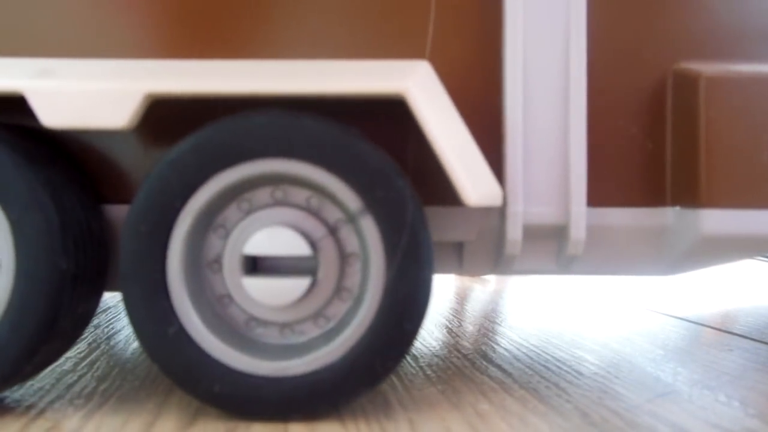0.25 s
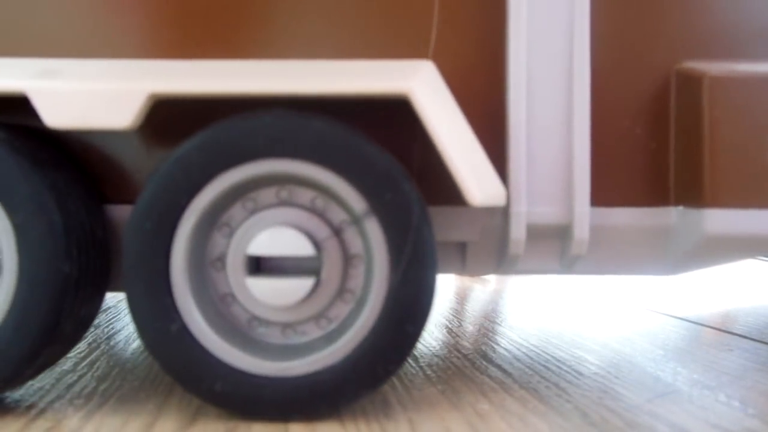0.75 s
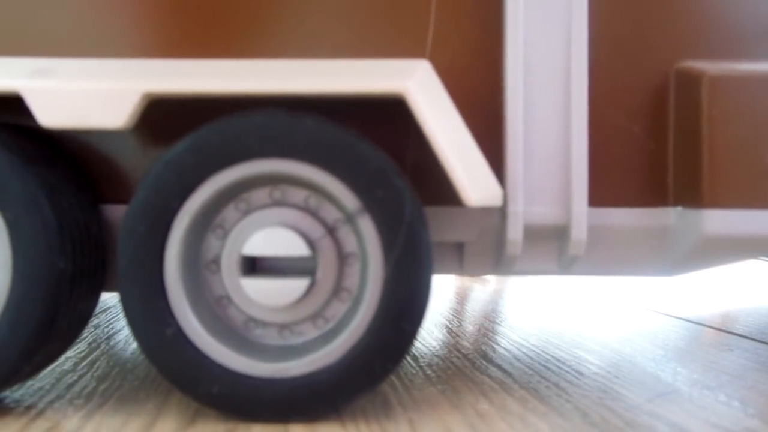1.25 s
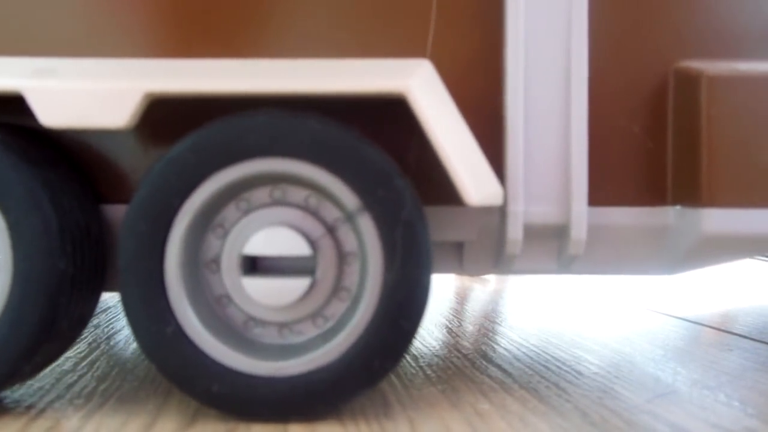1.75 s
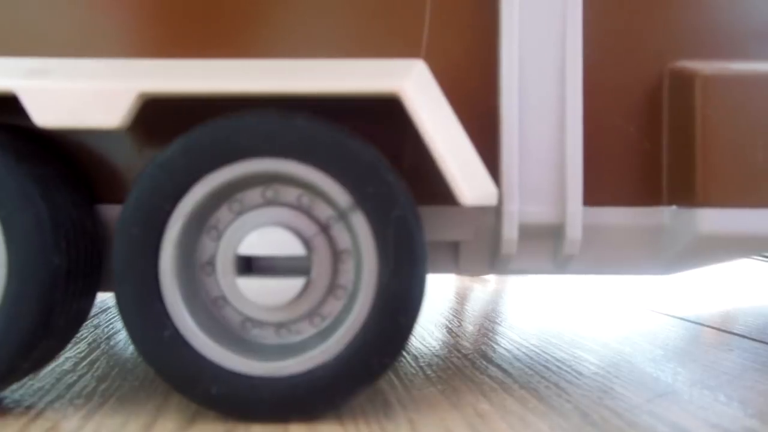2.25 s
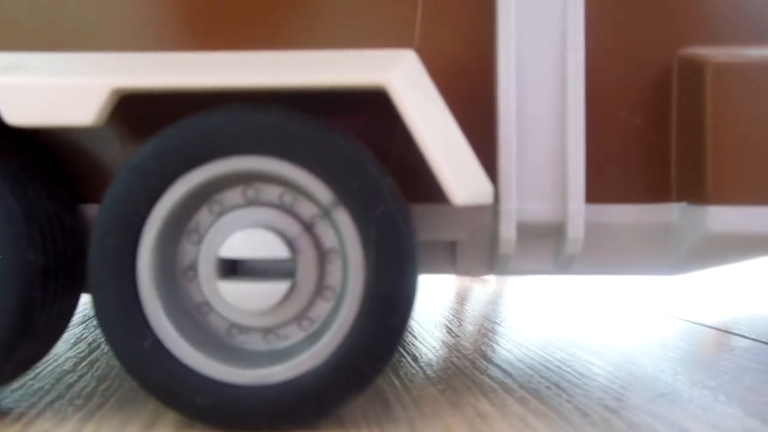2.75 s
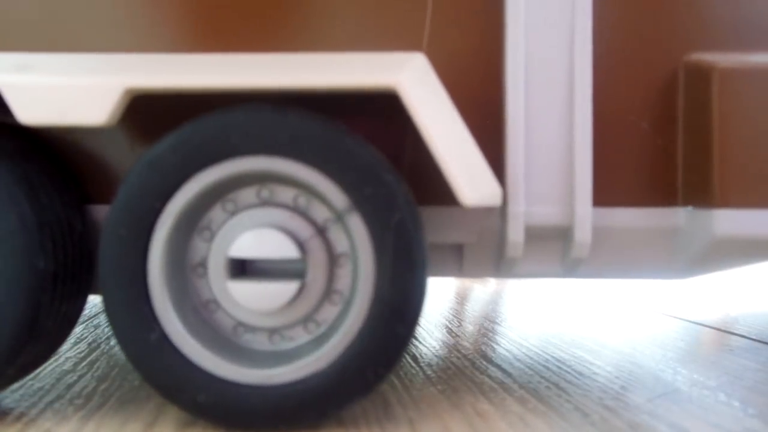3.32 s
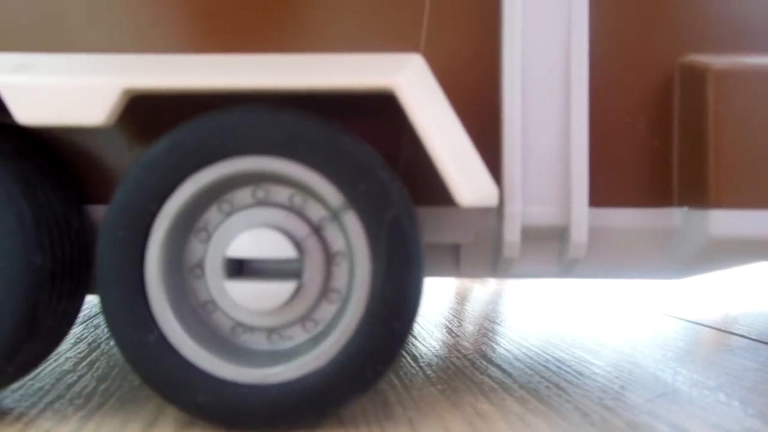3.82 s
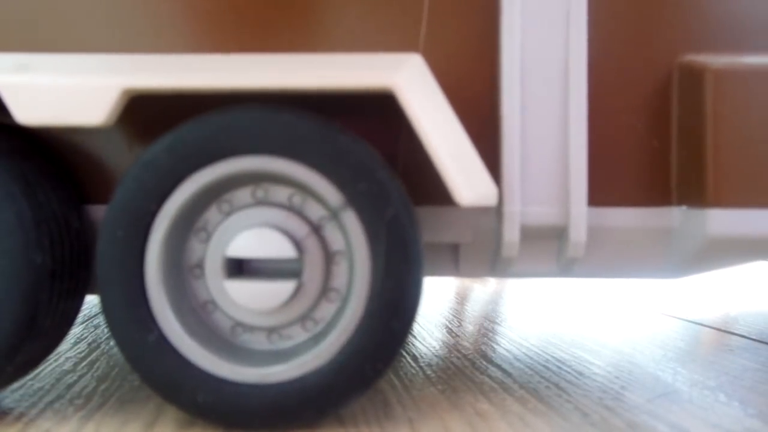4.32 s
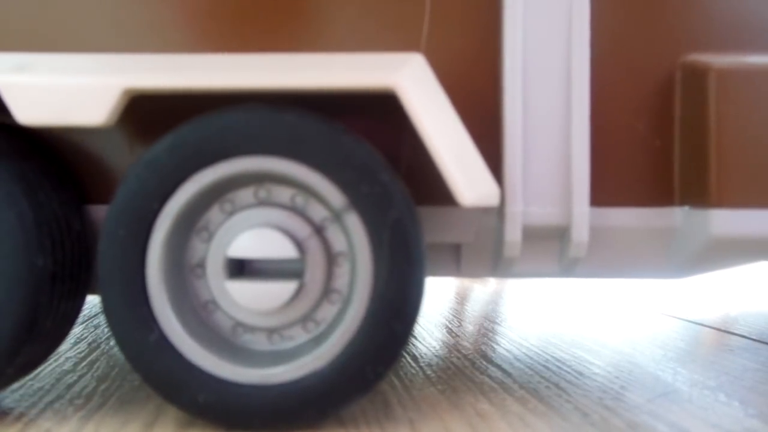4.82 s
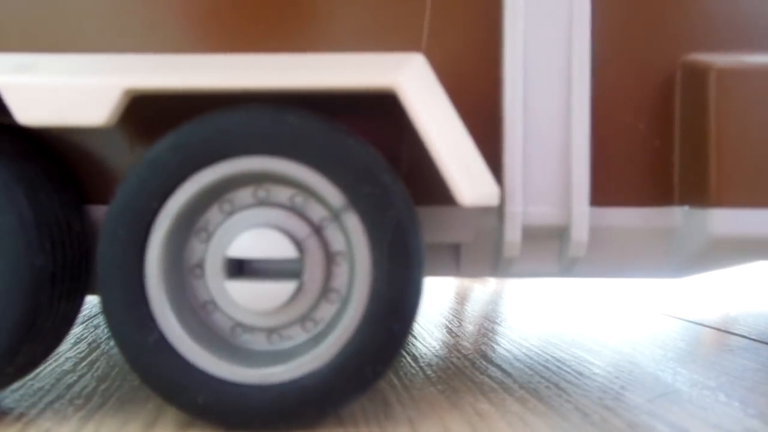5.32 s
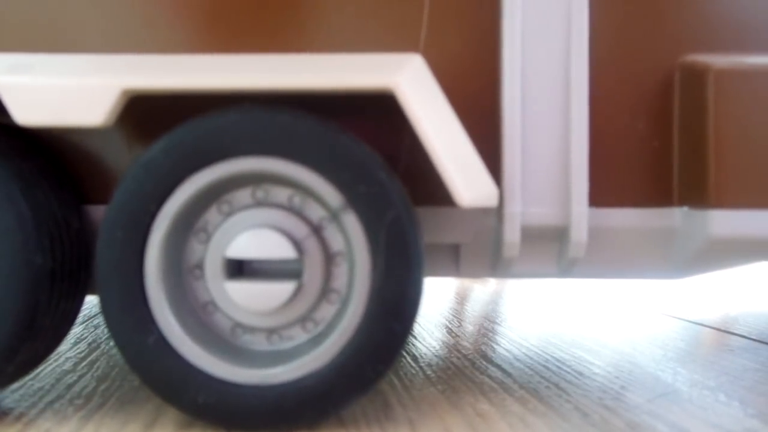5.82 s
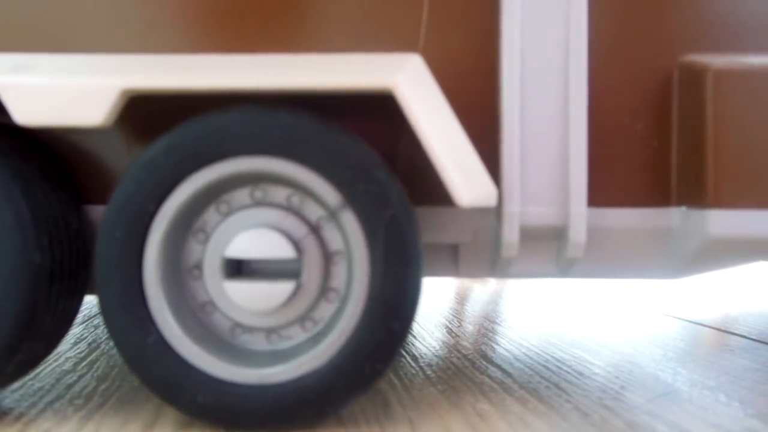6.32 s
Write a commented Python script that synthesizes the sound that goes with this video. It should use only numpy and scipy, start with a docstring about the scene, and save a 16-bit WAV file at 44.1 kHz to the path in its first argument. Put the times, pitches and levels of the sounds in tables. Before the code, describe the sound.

Close, dry stereo sound of a hollow plastic toy being fiddled with indoors. Light taps and scuffs start at once, grow denser and sharper, peak with one crisp clack just before three seconds, then continue as uneven knocks. Later there are only scattered soft touches and a final small cluster. Subtle rustling, light floor thuds, very little echo and a constant faint room hiss.

```python
"""Hollow plastic toys on a wooden floor

Small hollow plastic toys are handled close to a stereo microphone in a quiet room.
Each tap is a blow with a short rattle of loose parts, which excites damped modes of the toy; landings ring the
floor boards. Between taps, dense tiny slips of fingers and parts rub the same shell. Feedback delays give
the room's echo, and banded noise gives a steady room murmur and microphone hiss."""
import sys
import numpy as np
from scipy import signal
from scipy.fft import rfft, irfft, next_fast_len
from scipy.io import wavfile

SR = 44100
rng = np.random.default_rng(int(sys.argv[2]) if len(sys.argv) > 2 else 0)


def unload_wav(signal):
    """Save mono or channel-first audio to the path in sys.argv[1] as 16-bit WAV at rate SR, clipped to [-1, 1]."""
    wavfile.write(
        sys.argv[1],
        SR,
        np.round(np.clip(np.atleast_2d(signal).T, -1, 1) * 32767).astype(np.int16),
    )


N = 289737  # length [samples]

# Damped modes by the part that rings: (frequency [Hz], relative level [dB], 60 dB decay time [s])
SHELL = [(490, -9.5, 0.024), (679, -3.5, 0.029), (859, 2, 0.016), (999.7, 9.5, 0.02), (1193, 0.5, 0.016),
         (1381, -3, 0.04)]
# low thud of the floor boards: (frequency [Hz], relative level [dB], 60 dB decay time [s])
THUD = [(70, -7, 0.021), (119, -5, 0.03), (207, 1, 0.055)]
# hollow body: (frequency [Hz], relative level [dB], 60 dB decay time [s])
HOLLOW = [(240, -17, 0.01), (298.6, 54, 0.019)]
# panels: (frequency [Hz], relative level [dB], 60 dB decay time [s])
PANELS = [(1640, 5.5, 0.009), (1965, -4.5, 0.02), (2212, -4.5, 0.027), (2456, 2.5, 0.0096),
          (3015, 8, 0.0055)]
# ribs: (frequency [Hz], relative level [dB], 60 dB decay time [s])
RIBS = [(3650, 1.5, 0.016), (3910, 5, 0.019), (4180, -8, 0.03)]
# edges: (frequency [Hz], relative level [dB], 60 dB decay time [s])
EDGES = [(4880, -0.5, 0.012), (5210, 1, 0.018), (5570, 6, 0.0092), (6300, -9.5, 0.0041), (6930, -8, 0.0055)]
# rims: (frequency [Hz], relative level [dB], 60 dB decay time [s])
RIMS = [(7150, 9, 0.0016), (8740, -10, 0.016), (9650, 2.5, 0.0042), (10870, -3, 0.0035),
        (13100, 3.5, 0.0015)]
# Radiation of shell, thud, hollow, panels, ribs, edges and rims to the two microphone ports:
# (modes, lowest [Hz], highest [Hz], left-right likeness [-1 to 1], left re right [dB],
# haste: power applied to the stroke's envelope [1])
PARTS = [(SHELL, 437, 1355, 1, 0, 0.76), (THUD, 55, 450, 1, 0, 2.1), (HOLLOW, 172, 400, 0.96, 0, 0.85),
         (PANELS, 1630, 2840, 0.64, -0.7, 0.86), (RIBS, 3200, 4600, 0.38, -0.98, 0.86),
         (EDGES, 4400, 8160, 0.24, -0.61, 0.9), (RIMS, 6200, 21000, -0.089, -8, 0.88)]


def from_db(db):
    """Level definition: the amplitude gain of a level in dB."""
    return 10 ** (np.asarray(db) / 20)


def rms_one(x):
    """Power normalisation: a signal scaled to rms 1."""
    return x / np.sqrt(np.mean(x ** 2) + 1e-20)


def pair(mid, side, likeness):
    """Correlation: two unrelated draws, summed and differenced, give left and right of a set likeness."""
    alike = np.clip(likeness, -1, 1)
    common, opposed = np.sqrt(1 + alike) * mid, np.sqrt(1 - alike) * side
    return np.array([common + opposed, common - opposed]) / np.sqrt(2)


def grains(shape, per_s, spread_db):
    """Shot noise: random contacts of uneven size and sign."""
    size_db = spread_db * np.minimum(rng.exponential(1, shape), 4)
    size = from_db(size_db) * np.sign(rng.random(shape) - .5)
    return size * (rng.random(shape) < per_s / SR) + 1e-12


def ring(contacts, part, scatter_db=0, tilt_db=0, focus_db=0):
    """Modal superposition: two draws of contacts excite two-pole resonators, one for each mode of a part."""
    focus_hz = 950  # near the main shell mode
    modes, lowest_hz, highest_hz, likeness, lean_db, _ = part
    push = signal.lfilter([1, 0, -1], [1], contacts)
    rung = 0
    for hz, level_db, t60 in modes:
        r = from_db(-60 / (t60 * SR))
        w = 2 * np.pi * hz / SR
        tilted_db = level_db + tilt_db * np.log2(hz / lowest_hz)
        focused_db = tilted_db - focus_db * abs(np.log2(hz / focus_hz))
        chance_db = scatter_db * rng.standard_normal(contacts.shape[1:-1] + (1,))
        strength = from_db(focused_db + chance_db) / np.sin(w)  # 1 / sin(w) favours low modes
        rung = rung + strength * signal.lfilter([1], [1, -2 * r * np.cos(w), r * r], push)
    band = [lowest_hz, min(highest_hz, SR / 2.2)]
    rung = signal.sosfilt(signal.butter(3, band, "band", fs=SR, output="sos"), rung)
    left, right = pair(*rung, likeness)
    return np.array([left * from_db(lean_db / 2), right / from_db(lean_db / 2)])


def blows(s, rise_ms, fall_ms, parts, parts_db, tilts_db, focus_db=0):
    """Impact excitation: contacts swell to a blow and rattle away; a faster swell makes the blow stand out."""
    blow_ms = 8.5  # the blow's size against the rattle is this over the swell time
    pan_mean_db, pan_spread_db = -0.8, 2.1  # left re right
    lead = SR // 30  # samples ahead of the blow
    t = (np.arange(3 * lead) - lead) / SR
    rise_s = np.clip(rise_ms, .2, 25) / 1000 + 0 * s
    fall_s = np.clip(fall_ms, .5, 25) / 1000
    contacts = grains((len(s), 2, len(t)), 5000, 3.5).swapaxes(0, 1)
    contacts[0, :, lead] = blow_ms / 1000 / rise_s[:, 0]
    stroke = np.where(t < 0, np.exp(-(t / rise_s) ** 2), np.exp(-np.abs(t) / fall_s))
    sounds = 0
    for part, part_db, tilt_db in zip(parts, parts_db, tilts_db):
        haste = part[-1]
        part_focus_db = focus_db * (part is PARTS[0])  # the shell alone is focused
        rung = ring(contacts * stroke ** haste, part, scatter_db=3.5, tilt_db=tilt_db, focus_db=part_focus_db)
        # energy as mean square over 10 ms
        energy = np.sum(rung.mean(axis=0) ** 2, axis=-1, keepdims=True) / (SR / 100)
        sounds = sounds + rung / np.sqrt(energy) * from_db(part_db)
    pan_db = pan_mean_db + pan_spread_db * rng.standard_normal(s.shape)
    sounds = sounds * from_db([pan_db / 2, -pan_db / 2])
    out = np.zeros((2, N + len(t)))
    for k, start in enumerate(np.round(s[:, 0] * SR).astype(int)):
        out[:, start:start + len(t)] += sounds[:, k]
    return out[:, lead:lead + N]


def taps():
    """Modal excitation by impact: every tap rings all parts, with a balance set by the blow and the spot struck."""
    # taps and scuffs: (time [s], shell energy as rms over 10 ms [dB], hollow re shell [dB],
    # panels re shell [dB], treble re shell [dB], tilt of the shell modes by the spot struck [dB per octave],
    # swell [ms], rattle [ms]); swell is held to 0.2-25 ms, rattle to 0.5-25 ms
    tap_list = [(0.017,-56,-11,-4,-17,9,.7,17),(.051,-37.5,-20,-23,-34,0,1.2,7.5),(.06,-55.5,-13,-1,-11,8,.8,5.3),(.069,-41.5,-19,-21,-36,-2,1.4,4.8),
                (.251,-49.5,-34,-19,-35,14,7.3,8),(.277,-54.5,-9,-8,-24,-10,8,8.6),(.307,-46,-20,-8,-14.5,-6,15,10),(.344,-50.5,-27,-29,-35,6,4.5,18),
                (.596,-50.5,-21,-8,-14,1,15,22),(.902,-43.5,-29,-10,-26,5,37,14),(1.006,-59,-7,2,-12,-5,4.2,13),(1.043,-43.5,-12.5,-13,-32,-7,25,22),
                (1.077,-48,-20,-6.5,-26,3,1.7,15),(1.103,-53.5,1,-9,-21,-5,8.8,22),(1.145,-51,-18,-7,-27,2,16,16),(1.186,-43.5,-19,-13,-22.5,-5,2.4,4.8),
                (1.196,-48,-16,-12,-30,-4,0.63,5.8),(1.24,-50.5,-15,-25,-32,-8,3,2.5),(1.255,-52,-4,-21,-34,-17,6.9,28),(1.324,-47,-19,-31,-36,-3,10,29),
                (1.357,-46.5,-18,-21,-40,-7,6.8,30),(1.453,-47,-16,-20,-31,-8,10,18),(1.535,-42,-22,-13,-22.5,-10,5.5,12.4),(1.625,-49,-17,-7,-20,-20,7.1,13),
                (1.724,-43,-15,-11,-33,-13,6.6,6.4),(1.873,-55.5,-27,-4,-11,-2,1.3,4.4),(1.89,-44.5,-9.5,-5.5,-23.5,-13,0.67,8.2),(2.03,-46.5,-19,-16,-36,18,3.1,3.6),
                (2.061,-30.5,-14.5,-11,-26,1.5,1.9,4),(2.094,-41,-35,-13,-30,10,9.3,5.4),(2.127,-41,-24,-12,-30,2,1.8,10),(2.166,-38,-32,-15.5,-33,-1,5,1.8),
                (2.181,-41.5,-18,-21,-33,-16,2.7,9.6),(2.212,-44,-21,-4.5,-14,7,2.6,4.8),(2.245,-43,-7,-22,-31,-1,0.47,1.5),(2.251,-31,-12,-13,-25,-7,7.3,10.8),
                (2.262,-38.5,-10,-4,-19.5,17,0.68,4.9),(2.269,-42.5,-29,-13,-16,12,0.52,4.8),(2.347,-52.5,-21,9.5,-3.5,18,6.3,6.8),(2.369,-43,-16,-9.5,-29,3,6.4,9.7),
                (2.4,-51.5,-30,-6,-20,28,9,5.1),(2.478,-47,-20,-6.5,-20,8,25,8.2),(2.493,-46,-18,-22,-27,-9,11,29),(2.538,-33.5,-11,-2,-11.5,-7,1.4,12.7),
                (2.547,-36,-20,-14,-17,23,.24,9.1),(2.555,-37,-32,-10,-18,-9,.5,11),(2.66,-54,-19,-9,-29,8,25,4),(2.693,-47,-31,-5.5,-13.5,-12,2.4,2.5),
                (2.704,-36.5,-43,-10.5,-33,12,0.75,1.8),(2.78,-51.5,-10,-10,-15,-15,5.2,19),(2.827,-44,-23,-13.5,-28,5,12,35),(2.873,-54,-13,-12,-35,-7,25,22),
                (2.916,-56,-19,-12,5,8,0.5,1.9),(2.918,-23,-26,-10,-22,4.5,1.66,4.3),(2.985,-46.5,-11,-17,-36,5,9.4,6.8),(2.994,-44.5,-28,-22,-44,6,2.7,12),
                (3.13,-55.5,-15,-9,-21,12,12,20),(3.144,-37.5,-7.5,-10.5,-31,3,3.1,7.5),(3.202,-43,-16,-10.5,-35,-1,3,7.7),(3.293,-31,-11.5,-13,-33,-7,3.9,11.3),
                (3.429,-46,-7.5,-12.5,-38,11,1.5,7.1),(3.498,-51.5,-15,-7,-34,23,2.2,7.6),(3.518,-50.5,-8.5,-5.5,-26,3,5.6,29),(3.608,-37,-21,-15.5,-30.5,17,11.4,6.4),
                (3.622,-50,-17,-.5,-16,7,6.9,8.8),(3.668,-47.5,-25,-15,-31,-18,2.2,4.8),(3.763,-54,-15,-20,-24,-10,25,13),(3.795,-47.5,-10,-19,-25,-5,17,5.1),
                (3.89,-49,1,-24,-19,-6,2,16),(4.006,-41,-20,-2.5,-18.5,1,2.5,9.4),(4.078,-44.5,-13,-12,-23,7,30,10),(4.104,-46.5,-10,-8,-19,1,7.7,37),
                (4.15,-37,-10,-7,-20.5,-6,1.4,16),(4.176,-33,-8.5,-12,-24.5,-2,1.13,7.7),(4.222,-45.5,-13,-8.5,-38,-7,2.1,3.7),(4.299,-43,-32,-4,-20,10,6,8.3),
                (4.388,-46.5,-8,-5.5,-14.5,-19,32,32),(4.51,-48.5,-33,-3.5,-30,-16,3,8.7),(4.529,-55,-5,-17,-26,-5,5.4,28),(4.696,-51,-23,-27,-24,-6,2.6,6.8),
                (4.935,-49.5,-7,-15,-22,-9,2.5,7),(4.959,-49,-12,-11,-22,-4,8.3,28),(5.043,-53,-23,-6,-10.5,6,12,10),(5.357,-52,-8,-9,-12,7,15,21),
                (5.416,-39.5,-7.5,-20.5,-26,-7,2,7),(5.627,-56,-2.5,-3.5,-11,-6,20,19),(5.67,-45.5,-23,-9,-16.5,-1,21,43),(5.799,-58.5,-1,1.5,-10,2,9.4,29),
                (5.952,-53,-4,-27,-15,-7,9.3,28),(6.263,-62,-14,-5,-2.5,-12,20,25),(6.312,-53,-4,-27,-19,-16,3.9,25),(6.337,-52,-10,-0.5,-13.5,1,5.1,9.6),
                (6.357,-45.5,-3.5,-19,-20,-1,5.1,16),(6.378,-52,-20,-14,-17,-3,2.6,8.1),(6.396,-49,-1,-7.5,-13.5,-11,3,8)]
    s, shell_db, hollow_db, panel_db, treble_db, tilt_db, rise_ms, fall_ms = np.transpose(tap_list)[:, :, None]
    swell_doublings = np.log2(np.maximum(rise_ms, .2))  # re 1 ms
    harder_db = shell_db - shell_db.mean()
    thud_db = -34.5
    ribs_db = treble_db + .3 * (panel_db - treble_db)  # between panels and treble
    rims_db = treble_db - 4 + 0 * swell_doublings
    parts_re_shell_db = [0, thud_db, hollow_db, panel_db, ribs_db, treble_db, rims_db]
    parts_db = [shell_db + db for db in parts_re_shell_db]
    panel_tilt_db = -1 + 0.4 * harder_db  # harder blows reach the higher panel modes
    # slow soft contacts favour the main shell mode: dB per octave away from it
    focus_db = 5.5 + 3.5 * swell_doublings - .2 * harder_db
    return blows(s, rise_ms, fall_ms, PARTS, parts_db, [tilt_db, 0, 0, panel_tilt_db, 0, 0, 0], focus_db)


def drift(rate):
    """Low-pass noise: two equal poles at a rate in Hz leave a slow chance swing of spread 1."""
    step = 40  # drawn once in so many samples, then interpolated
    r = np.exp(-2 * np.pi * step * rate / SR)
    slow = signal.lfilter([1], [1, -2 * r, r * r], rng.standard_normal(N // step + 2002))[2000:]
    return np.interp(np.arange(N) / step, np.arange(len(slow)), rms_one(slow))


def rubbing():
    """Friction as stick-slip noise: dense tiny slips, coming in clumps, excite the same modes."""
    # rubbing on the shell: (time [s], shell level [dB], bright rustle level [dB])
    rub_levels = [(0,-44.5,-59.5),(.14,-70,-88),(.29,-59.5,-81),(.71,-79,-82),(1.08,-62,-74),(1.72,-60.5,-70.5),(1.95,-72,-79),(2.25,-58,-62.5),
                  (2.56,-58,-62.5),(2.82,-60.5,-82),(2.949,-43,-57),(3.11,-89,-91),(3.24,-57.5,-64),(3.45,-65.5,-69.5),(3.82,-55.5,-62.5),(4.37,-54,-64),(4.55,-78,-70),
                  (4.96,-73,-67.5),(5.5,-64.5,-68.5),(5.78,-65,-65),(6.03,-57.5,-68.5),(6.2,-73,-68.5),(6.57,-61,-67)]
    s, *levels = np.transpose(rub_levels)
    shell_db, bright_db = [np.interp(np.arange(N) / SR, s, c) for c in levels]
    low_db = -72 + 0.73 * (shell_db + 58)  # the hollow rustle takes a share of the shell's swing
    slips = grains((2, N), 2500, 3.2) * from_db(3.0 * drift(25))
    rubbed_parts = PARTS[:1] + PARTS[2:-1]  # neither thud nor rims
    shell, hollow, panels, ribs, edges = [rms_one(ring(slips, part)) for part in rubbed_parts]
    bright = panels + from_db(-8.5) * ribs + from_db(-12.5) * edges
    return from_db(low_db) * hollow + from_db(shell_db) * shell + from_db(bright_db) * bright


def thumps():
    """Impact on a plate: a toy's landing rings the low modes of the floor boards only."""
    # landings: (time [s], energy as rms over 10 ms [dB], tilt of the board modes [dB per octave], rattle [ms])
    landings = [(1.103,-58.5,8,25),(1.145,-65,1,25),(1.724,-53.5,0,9.9),(2.249,-40,1,4.7),(2.258,-44,-8,7),(2.369,-67,-7,13),(2.538,-62,-1,18),(2.78,-53,8,25),
                (3.145,-48,8,9.7),(3.201,-63.5,3,8),(3.29,-70,5,16),(3.668,-61,11,3.9),(3.892,-46,5,7.3),(4.105,-58,-1,25),(4.935,-69,0,7),(5.044,-61,-1,16),
                (5.357,-61,-3,19),(5.415,-61,3,5),(6.265,-57.5,0,25),(6.311,-59,5,27),(6.357,-47,6,8.7),(6.379,-68,0,7)]
    swell_ms = 2.34
    s, level_db, tilt_db, fall_ms = np.transpose(landings)[:, :, None]
    return blows(s, swell_ms, fall_ms, PARTS[1:2], [level_db], [tilt_db])


def room(x):
    """Reverberation by recirculation: four feedback delays a side, duller on every round."""
    t60_s, wall_cut_hz = 0.12, 7400  # decay before the dulling, and the low-pass met on each round
    size = next_fast_len(N + SR // 2)
    w = 2 * np.pi * np.fft.rfftfreq(size)
    dull = 1 / (1 + 1j * w * SR / (2 * np.pi * wall_cut_hz))
    loops = []
    for lag_s in rng.uniform(0.0053, .03, size=8):
        loops.append(from_db(-60 * lag_s / t60_s) * dull * np.exp(-1j * w * lag_s * SR))
    # geometric series of all rounds
    echoes = np.array([g / (1 - g) for g in loops]).reshape(2, 4, -1).sum(axis=1)
    return irfft(rfft(x.mean(axis=0), size) * echoes, size)[:, :N]


def at_hz(points, hz):
    """Logarithmic frequency scale: a table interpolated along octaves."""
    table = np.array(points)
    return np.interp(np.log(hz), np.log(table[:, 0]), table[:, 1])


def air():
    """Diffuse noise field: murmur and hiss in half-octave bands, alike in the bass, unrelated in the treble."""
    # room murmur and hiss: (frequency [Hz], relative level [dB per Hz])
    spectrum = [(12, -40), (20, -5.5), (49, -1), (118, -4), (217, 0.5), (620, 0), (1020, 0), (1510, -5),
                (2220, -8), (3460, -10), (3860, -13.5), (6360, -17.5), (9110, -20.5), (13800, -24),
                (15000, -74)]
    # likeness of the two ports: (frequency [Hz], left-right likeness [-1 to 1])
    likeness = [(60, 0.76), (180, 0.58), (540, 0.42), (1620, 0.18), (4870, 0.095), (14600, -0.11)]
    level_db = -57.5
    out, edges_hz = 0, 18 * 2 ** np.arange(0, 10, .5)
    white = rng.standard_normal((2, 2, N))  # neighbouring bands get unrelated noise
    for k, (low, high) in enumerate(zip(edges_hz, [*edges_hz[1:], 17000])):
        band = signal.sosfilt(signal.butter(2, [low, high], "band", fs=SR, output="sos"), white[k % 2])
        hz = np.sqrt(low * high)
        out = out + from_db(at_hz(spectrum, hz)) * pair(*band, at_hz(likeness, hz))
    return from_db(level_db) * rms_one(out)


def scene():
    """Linear superposition: the toy and its landings, their echo in the room, and the air."""
    toy = taps() + thumps() + rubbing()
    return toy + from_db(-26.5) * room(toy) + air()


def record(dry):
    """Band limiting: a steep low-pass takes the top 60 dB down from 15 kHz up."""
    return signal.sosfilt(signal.cheby2(12, 60, 15000, fs=SR, output="sos"), dry)


dry = scene()
out = record(dry)
unload_wav(out)
```